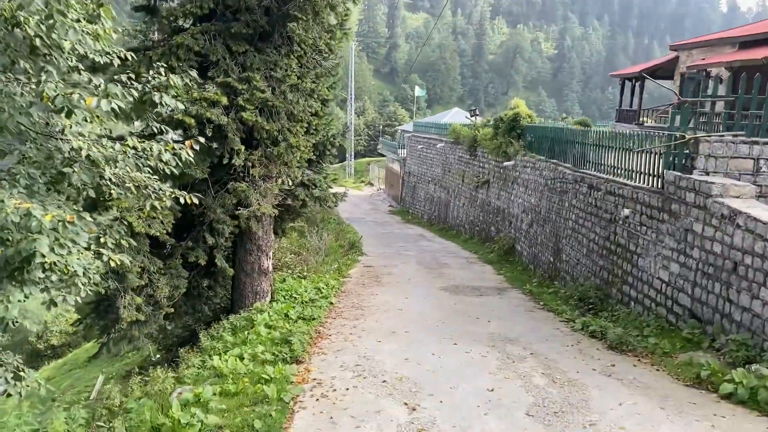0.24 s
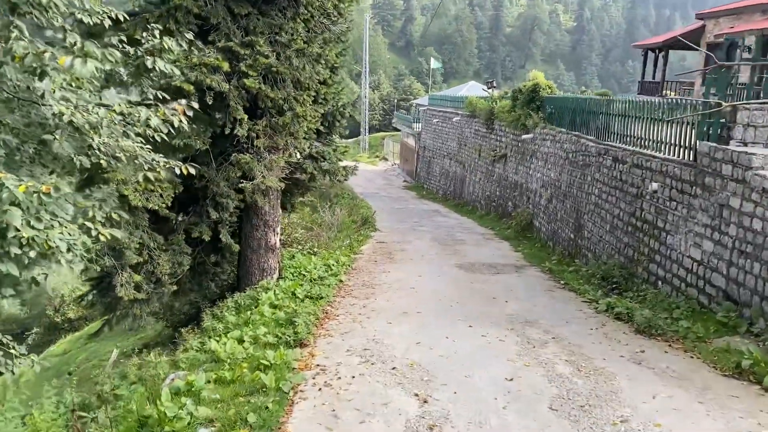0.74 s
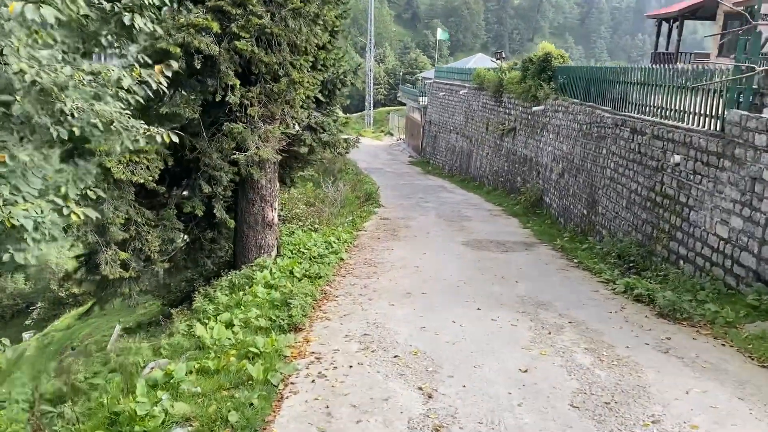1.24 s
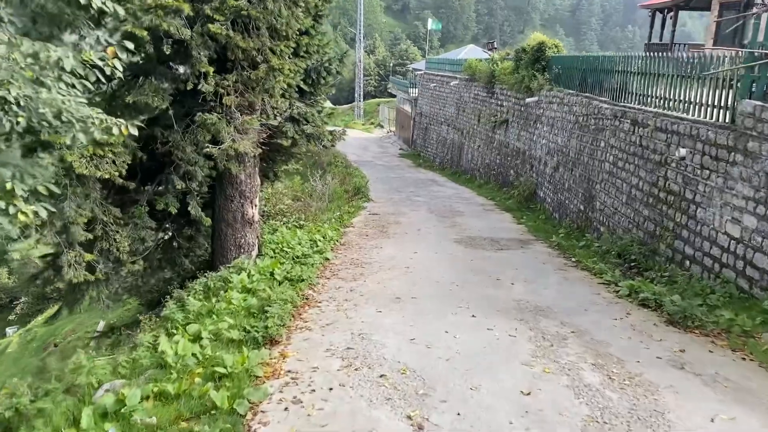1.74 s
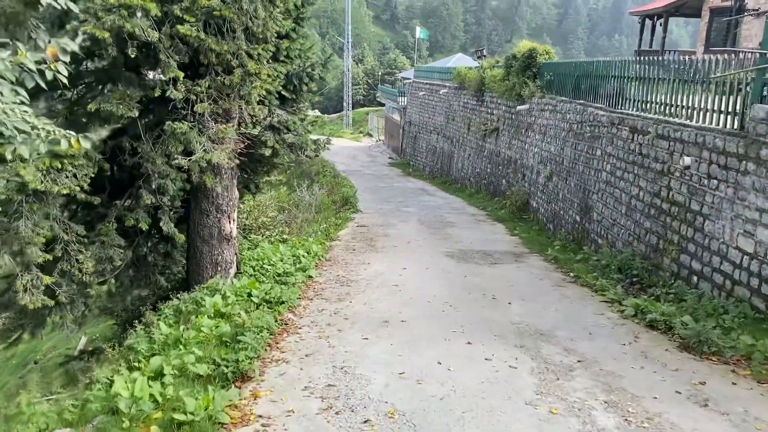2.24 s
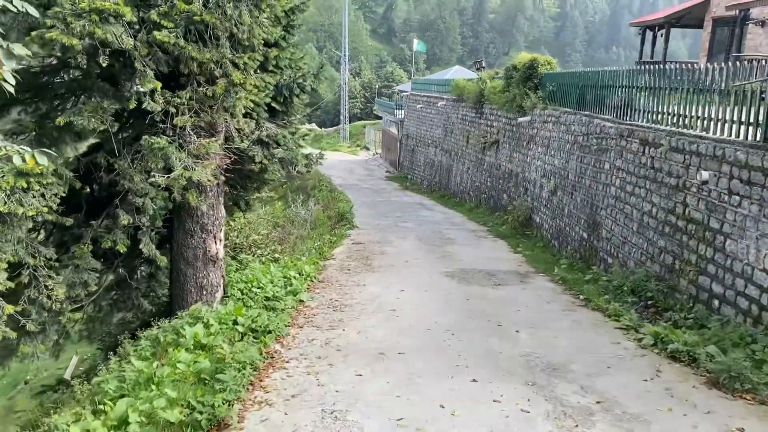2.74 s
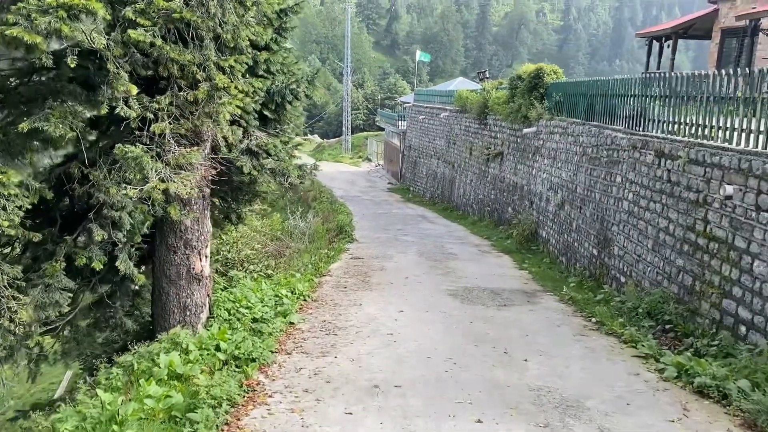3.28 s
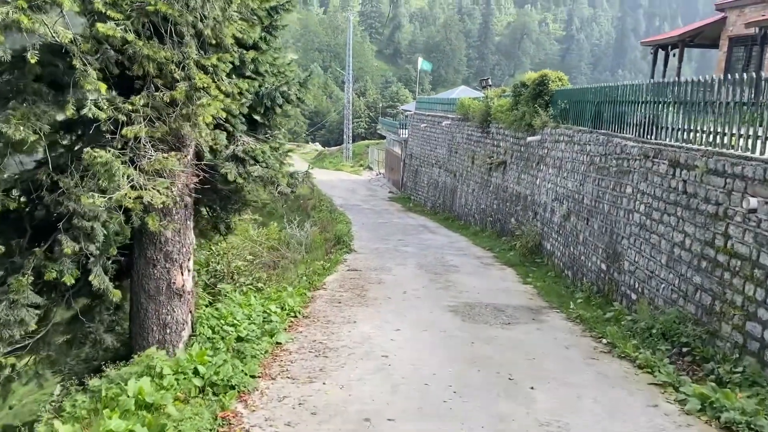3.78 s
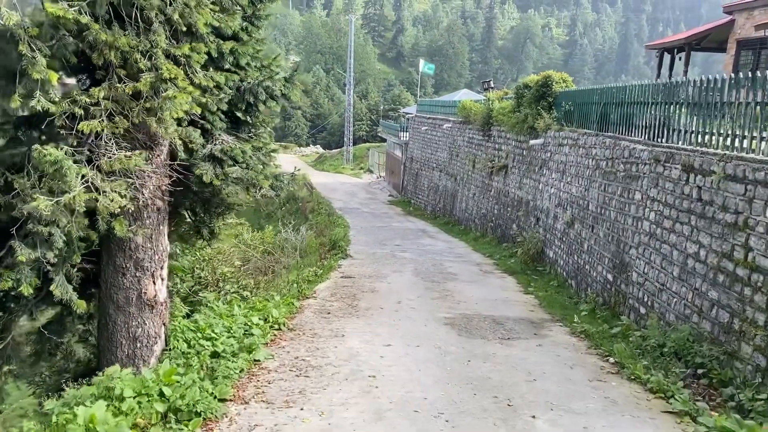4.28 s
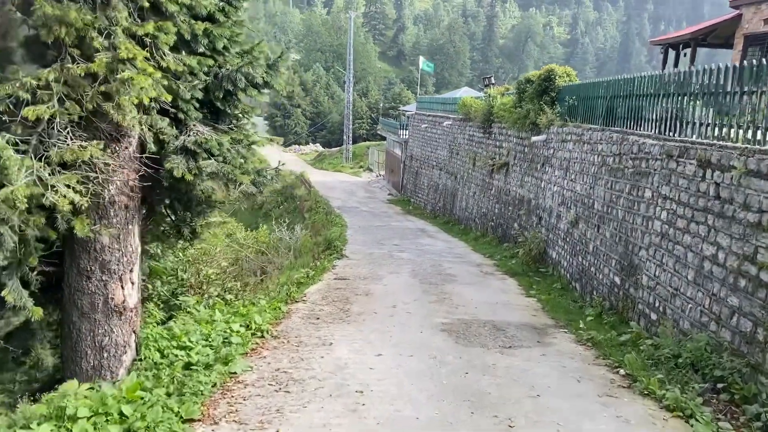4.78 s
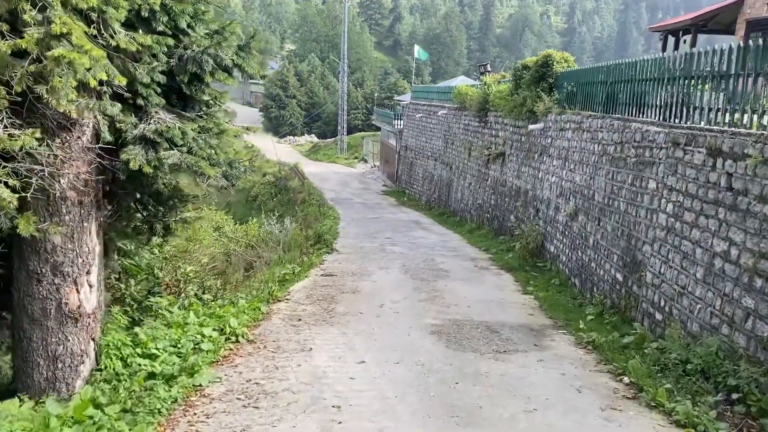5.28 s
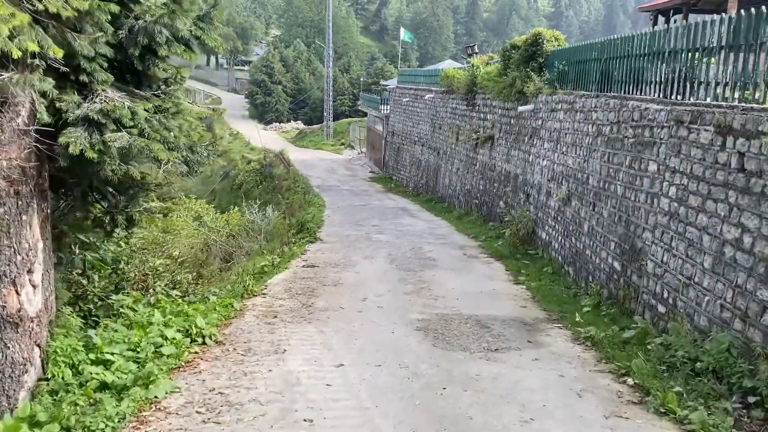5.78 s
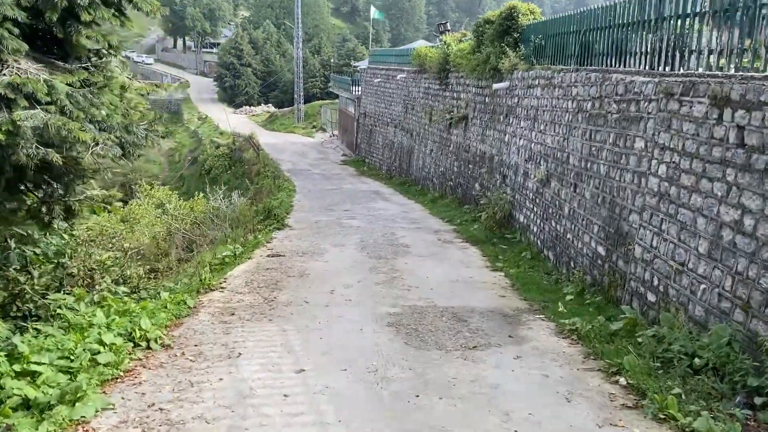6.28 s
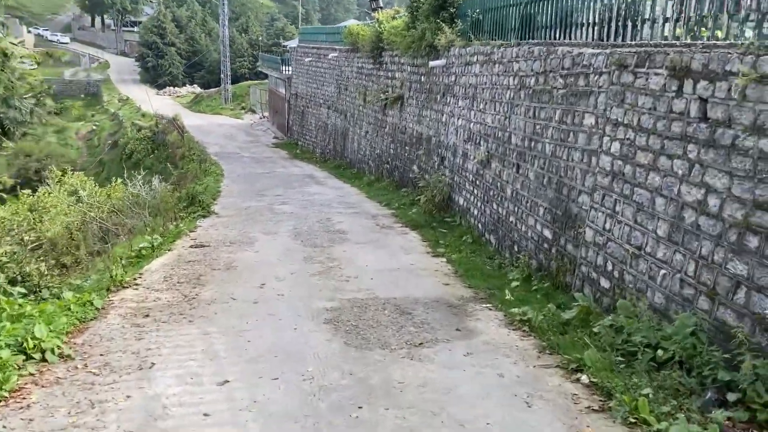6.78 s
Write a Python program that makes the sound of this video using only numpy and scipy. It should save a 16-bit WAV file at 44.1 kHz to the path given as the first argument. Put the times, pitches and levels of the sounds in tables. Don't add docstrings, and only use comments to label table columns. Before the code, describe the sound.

A forest lane in summer, heard from a walker's handheld stereo microphone. From 0 s a dense, piercing cicada hiss fills the treble, with a lower insect chorus beneath; the high layer gradually weakens. The nearest singer rattles fast, slows and stops at about 1.6 s. Short rough chirps, often in pairs, recur throughout, and even, low-pitched insect drones come and go from 0.9 to 5.2 s. A crow gives five hoarse caws at about 2.1, 2.5, 2.9, 3.3 and 3.7 s, slightly falling in pitch, softened by the trees. Farther cicadas sing at 3.1-4.2 s and 4.6-5.5 s. From 4.9 to 6.8 s a close one buzzes in short, sharp click bursts. Shoes knock and scratch on grit, busiest in the first 1.4 s; small stones snap, especially around 5.6-6.2 s. Clothes swish with each stride, and low wind gusts bump the microphone until the end at 7 s.

```python
import sys
import numpy as np
from scipy import signal
from scipy.fft import rfft, irfft, next_fast_len
from scipy.io import wavfile
from scipy.ndimage import uniform_filter1d, minimum_filter1d, map_coordinates

SR = 44100
rng = np.random.default_rng(int(sys.argv[2]) if len(sys.argv) > 2 else 0)


def dump_mix(stems):
    frames = np.atleast_2d(stems).T
    limited = np.clip(frames, -1, 1)
    pcm = np.round(limited * 32767).astype(np.int16)
    wavfile.write(sys.argv[1], SR, pcm)


def volts(x):
    e = np.asarray(x, float) / 20
    return 10 ** e


N = 309582
SIZE = next_fast_len(N)
HZ = np.arange(SIZE // 2 + 1) * SR / SIZE
T = np.arange(N) / SR


def rms_one(x):
    return x / np.sqrt(np.mean(x ** 2) + 1e-20)


def drift(rate):
    slow = rng.standard_normal(int(N / SR * rate) + 3)
    coarse = T[::16]
    return np.interp(T, coarse, map_coordinates(slow, [coarse * rate], order=3))


def colour(x, spectrum):
    hz, db = np.transpose(spectrum)
    weight = volts(np.interp(np.log(HZ + 1), np.log(hz), db, -90, -90))
    return irfft(rfft(x, SIZE) * weight, SIZE)[..., :N]


def resonate(x, modes, spread_db=0):
    out = 0
    for k, (hz, width, db) in enumerate(modes):
        r = np.exp(-np.pi * width / SR)
        struck = x * volts(db + spread_db * rng.standard_normal(N)) + 1e-18
        poles = [1, -2 * r * np.cos(2 * np.pi * hz / SR), r * r]
        out = out + (-1) ** k * signal.lfilter([1, 0, -1], poles, struck) * (1 - r * r) / 2
    return out


def pulses(rate, jitter, weak_db, late):
    phase = np.cumsum(rate * (1 + jitter * drift(60))) / SR
    first = np.diff(np.floor(phase), prepend=0)
    second = np.diff(np.floor(phase + .5 - late), prepend=0)
    return first + second * volts(weak_db)


def phrases(rows, edge):
    rate, gain = np.full(N, 150.), np.zeros(N)
    for start, end, per_s, db in rows:
        on = np.clip(np.minimum(T - start, end - T) / edge, 0, 1)
        rate[on > 0] = per_s
        gain += volts(db) * np.sin(on * np.pi / 2) ** 2
    return rate, gain


def leaves(x, t60, wet_db):
    lag = np.arange(int(.5 * SR)) / SR
    tails = rng.standard_normal((2, len(lag))) * volts(-60 * lag / t60) * np.minimum(lag / 0.0012, 1)
    tails *= volts(wet_db) / np.sqrt(np.sum(tails ** 2, axis=1, keepdims=True))
    near, sideways = signal.fftconvolve(x[None], tails, axes=1)[:, :N]
    return x + near, sideways


def ports(front, sideways, pan_db=0):
    # f/Hz, lead of the right [turns], likeness [0-1]
    port_pair = [(296, 0, 1), (447, 0, 0.48), (675, -0.092, 0.53), (1120, -0.12, 0), (1770, 0.21, 0),
                 (2130, -0.093, 0.88), (3690, -0.28, 0.6), (4270, 0.041, 0.26), (5360, -0.28, .35),
                 (6500, -0.083, 0.6), (7560, 0.14, 0.93), (9050, 0.51, 1), (10720, 0.97, .96),
                 (13260, 1.5, 0.8), (16800, 2.126, 0.8)]
    hz, turns, alike = np.transpose(port_pair)
    half = np.exp(1j * np.pi * np.interp(HZ, hz, turns))
    alike = np.clip(np.interp(HZ, hz, alike), 0, 1)
    a = rfft(front, SIZE) * np.sqrt((1 + alike) / 2)
    b = rfft(sideways, SIZE) * np.sqrt((1 - alike) / 2)
    left = (a + b) / half * volts(pan_db / 2)
    right = (a - b) * half * volts(-pan_db / 2)
    return irfft(np.array([left, right]), SIZE)[:, :N]


def wind():
    # f/Hz, level/dB per Hz
    rumble = [(18, -39), (30, -10.5), (48, 2), (70, 2), (110, -3), (180, -9.5), (300, -20.5), (500, -41),
              (900, -50)]
    # t/s, level/dB
    breeze_course = [(0.0, -49), (0.78, -55), (1.27, -49), (1.64, -53.5), (2.46, -51), (4.28, -58),
                     (4.4, -53), (4.59, -59), (5.08, -59), (6.22, -49), (6.55, -48), (7.02, -57)]
    # t/s, length/s, level/dB
    gusts = [(0.07, 0.076, -43.5), (0.214, 0.042, -44), (0.437, 0.11, -43.5), (0.74, 0.17, -46),
             (0.983, 0.17, -44), (1.212, 0.094, -44), (1.324, 0.1, -47), (2.063, 0.034, -43.5),
             (2.486, 0.16, -47), (3.274, 0.018, -32), (3.36, 0.023, -36), (3.689, 0.031, -40),
             (4.214, 0.14, -44), (4.38, 0.16, -43.5), (4.663, 0.052, -43), (4.734, 0.029, -44),
             (4.936, 0.0244, -39), (5.323, 0.048, -44.5), (5.501, 0.16, -42), (5.707, 0.036, -43),
             (5.981, 0.16, -41.5), (6.2, 0.12, -49), (6.333, 0.19, -45), (6.584, 0.044, -44),
             (6.858, 0.064, -43)]
    edge_s = 0.024
    lumps = rng.standard_normal(N) * volts(1.14 * drift(25) + 2.9 * drift(70))
    buffet = colour(lumps, rumble)
    push = 0
    for s, length, db in gusts:
        on = np.clip(np.minimum(T - s, s + length - T) / edge_s + 0.35, 0, 1)
        push = push + volts(db - 0.5) * on
    breeze = volts(np.interp(T, *np.transpose(breeze_course)) + 1.5 + 2.8 * drift(14))
    return np.maximum(breeze, push) * buffet / np.sqrt(uniform_filter1d(buffet ** 2, size=4000))


def chorus_and_hush():
    # f/Hz, level/dB per Hz
    shrill_colour = [(4000, -95), (5500, -31), (7000, -9), (8200, -6), (9400, 1), (10600, -1), (12000, -5),
                     (13300, -4.5), (14200, -12.5), (15500, -17.5), (16300, -43)]
    low_colour = [(1600, -27), (2050, -10.5), (2400, .5), (2900, 3), (3500, -0.5), (4000, -8), (4600, -22)]
    middle_colour = [(3500, -24.5), (4000, -9.5), (4600, -6.5), (5500, -4), (6500, -4), (7500, -6),
                     (8300, -11.5)]
    hush_colour = [(250, 2.5), (350, -4.5), (500, -2.5), (800, -9.5), (1300, -6), (1750, -8.5),
                   (2200, -6.5)]
    # t/s, level/dB
    vigour = [(0, -36.5), (.6, -36.5), (1.19, -35.5), (1.52, -37.5), (1.6, -40.5), (2.0, -39.5),
              (2.4, -41.5), (3.3, -40), (3.9, -41.5), (4.15, -44), (4.35, -42.5), (4.58, -45.5),
              (4.95, -43.5), (5.45, -45.5), (5.75, -43.5), (6.25, -43.5), (6.6, -47.5), (7.02, -46.5)]
    # t/s, level/dB
    nearness = [(0, -51), (.8, -50), (1.6, -49), (2.4, -49.5), (3.1, -50), (4.1, -48.5), (4.8, -47),
                (5.3, -47.5), (6.0, -45), (6.4, -48.5), (7.02, -49)]
    # t/s, level/dB
    strides = [(.22, -62), (.82, -62), (1.32, -66), (1.84, -61.5), (2.35, -63), (2.84, -58), (3.46, -60),
               (4.05, -68.5), (4.59, -64.5), (5.1, -66), (5.58, -60), (6.121, -64.5), (6.62, -76)]
    low_db, low_follows = -43.5, 0.065
    hush_db, rise_s, fall_s = -65.5, 0.11, 0.084

    vigour_db = np.interp(T, *np.transpose(vigour))
    swish = 0
    for s, db in strides:
        before = np.minimum(T - s, 0) / rise_s
        after = np.maximum(T - s, 0) / fall_s
        swish = swish + volts(db - 12.0 * before ** 2 - 6.9 * after ** 2)
    white = rng.standard_normal((4, 2, N)) * volts(2.56 * rng.standard_normal(N))
    shrill = volts(vigour_db + 3.5 + 0.6 * drift(6) + 0.64 * drift(200))
    low_swing_db = low_follows * (vigour_db - vigour_db.mean())
    low = volts(low_db - 2.0 + low_swing_db + 1.34 * drift(13) + 0.5 * drift(100))
    middle = volts(np.interp(T, *np.transpose(nearness)) + 1.1 * drift(8) + .6 * drift(60))
    hush = (volts(hush_db) + swish) * volts(1.6 * drift(3.93) + 2.0 * drift(40))
    gains = (shrill, low, hush, middle)
    colours = (shrill_colour, low_colour, hush_colour, middle_colour)
    layers = zip(gains, white, colours)
    return ports(*sum(gain * rms_one(colour(w, spectrum)) for gain, w, spectrum in layers))


def steps():
    # t/s, peak level/dB, ring f/Hz, scratch at 600-1600 Hz [dB]
    soles = [(0.152, -34.5, 322, -20), (0.218, -32, 430, -3.5), (0.543, -47, 553, -31),
             (0.683, -44, 277, -18), (0.711, -26.5, 390, -24), (0.764, -38.5, 336, -7),
             (0.861, -28.5, 420, -26), (1.257, -31.5, 283, -24), (1.325, -39.5, 530, -5),
             (1.37, -32.5, 450, -18), (1.834, -36.5, 288, -8), (2.289, -40, 266, -1),
             (2.372, -31.5, 350, -8.5), (2.439, -42, 323, -11), (2.827, -41, 310, -23),
             (3.447, -42, 283, -4), (3.524, -40, 553, -15), (4.463, -41, 317.4, -5), (4.561, -43, 576, -8),
             (4.617, -35.5, 555.4, -14), (4.97, -37.5, 254.8, -10), (5.688, -49, 335.4, 2),
             (6.139, -36.5, 374, -5), (6.297, -42.5, 557, -24), (6.672, -41.5, 360, -6.5),
             (6.748, -39, 250, -27), (6.828, -44, 536, -18)]
    # t/s, peak level/dB
    stones = [(0.69, -58), (0.74, -54), (0.777, -52), (0.853, -48), (1.296, -49), (1.757, -57),
              (1.919, -55.5), (2.409, -65), (2.795, -53), (2.886, -55), (4.582, -47.5), (5.144, -55),
              (5.337, -58), (5.592, -58), (5.612, -48), (5.636, -53), (5.785, -61), (5.812, -52.5),
              (5.841, -51), (6.075, -58), (6.15, -45), (6.163, -54), (6.173, -52), (6.194, -59)]
    stone_hz, stone_grit_db = 292, 8.5
    crack_db, crack_t60_s = -1, .012
    out, t = np.zeros((2, N + 4000)), np.arange(4000) / SR
    contacts = soles + [(s, db, stone_hz, stone_grit_db) for s, db in stones]
    luck = rng.standard_normal((len(contacts), 2, 4000))
    band = signal.butter(2, [600, 1600], "band", fs=SR, output="sos")
    scratch = signal.sosfilt(band, luck)
    for (s, db, hz, grit_db), grit in zip(contacts, scratch):
        ring = np.sin(2 * np.pi * hz * t) * volts(-60 * t / 0.023)
        overtone = np.sin(2 * np.pi * 2.17 * hz * t) * volts(-8 - 60 * t / 0.019)
        knock = (ring + overtone) * np.minimum(t / 0.0021, 1) * [[1], [.1]]
        rub = 3.0 * volts(grit_db - 60 * t / 0.06) * np.minimum(t / 0.0024, 1) * grit
        out[:, round(s * SR):][:, :4000] += volts(db) * (knock + rub)
    snaps = np.diff(luck[len(soles):], prepend=0)
    for (s, db), snap in zip(stones, snaps):
        out[:, round(s * SR):][:, :4000] += volts(db + crack_db - 60 * t / crack_t60_s) * snap
    return ports(*out[:, :N])


def crow():
    # t/s, length/s, crest pitch f/Hz, crest level/dB
    caws = [
        (2.108, 0.19, 310.3, -43),
        (2.508, 0.2, 304, -41),
        (2.908, 0.2, 301.3, -41),
        (3.313, .195, 297.4, -42.5),
        (3.745, 0.19, 296.9, -43),
    ]
    arch = [(0, .8), (.1, .84), (.27, .94), (.4, .985), (.52, .995), (.64, .98), (.76, .94), (.88, .88),
            (1, .83)]
    # share of the caw [0-1], level/dB
    shape = [(0, -16), (.12, -11), (.27, -1.5), (.5, 1.5), (.78, -0.5), (.88, -10.5), (1, -25)]
    # multiple of the pitch, level/dB, loss with the beak nearly shut [dB], favoured at [share of caw]
    partials = [(2, -30, 0, .5), (3, -16, -14, .5), (4, -3, -2, .3), (5, 1, -22, .7), (6, 1.5, -26, .5),
                (7, -16, -25, .5)]
    favour_db, favour_width = 7, .12
    breath_db, rasp_db = -11.5, 3.0
    echo_s, echo_db = .19, -23

    pitch, gain, shut, strain, done = np.full(N, 280.), np.zeros(N), np.zeros(N), np.zeros(N), np.zeros(N)
    for start, length, top_hz, db in caws:
        share = (T - start) / length
        strain = np.where(share >= 0, np.clip(share, .35, .8), strain)
        on = (share >= 0) & (share <= 1)
        done[on] = share[on]
        pitch[on] = top_hz * np.interp(share[on], *np.transpose(arch))
        gain[on] = volts(db + np.interp(share[on], *np.transpose(shape)))
        shut[on] = np.interp(share[on], [.12, .4, .85, 1], [0.51, 0.23, 0.014, 0.33])
    phase = 2 * np.pi * np.cumsum(pitch * (1 + 0.009 * drift(90))) / SR
    flutter = 1 + 1.0 * strain * np.cos(phase / 3 + 2.5 * drift(27))
    voice = 0
    for k, db, lost_db, best in partials:
        favour = favour_db * np.exp(-((done - best) / favour_width) ** 2)
        strength = volts(db + lost_db * shut + favour + 2.0 * drift(40))
        breath = drift(300) * np.sin(k * phase) + drift(300) * np.cos(k * phase)
        voice = voice + strength * (np.sin(k * phase) + volts(breath_db) * breath)
    voice /= np.sqrt(uniform_filter1d(voice ** 2, size=1500))
    rasp = volts(rasp_db * strain * drift(250))
    call = volts(0.5) * uniform_filter1d(gain, size=300) * voice * flutter * rasp
    call = call + volts(echo_db) * np.interp(T - echo_s, T, call)
    return ports(*leaves(call, t60=.12, wet_db=-8), pan_db=-5.5)


def chirper():
    # t/s, end/s, pulse rate f/Hz, level/dB
    chirps = [(.105, .18, 270, -43.5), (.248, .31, 280, -43), (.398, .47, 270, -42), (.555, .63, 280, -42),
              (.74, .81, 220, -40.5), (1.15, 1.225, 300, -42), (1.3, 1.365, 255, -39),
              (1.68, 1.75, 284, -41.5), (1.822, 1.89, 310, -41.5), (2.358, 2.43, 260, -40),
              (2.5, 2.565, 470, -46), (2.765, 2.805, 320, -44), (3.115, 3.175, 267, -42),
              (3.255, 3.32, 260, -38.5), (3.605, 3.65, 274, -46.5), (3.755, 3.81, 200, -43),
              (3.945, 4.015, 267, -39), (4.086, 4.16, 360, -42), (4.175, 4.214, 310, -47.5),
              (4.436, 4.48, 300, -44), (4.57, 4.62, 205, -44.5), (4.787, 4.855, 295, -42),
              (4.93, 5.0, 290, -43.5), (5.712, 5.765, 330, -43), (5.85, 5.92, 310, -41.5),
              (6.012, 6.075, 325, -40), (6.18, 6.238, 310, -41.5), (6.662, 6.72, 290, -46.5),
              (6.8, 6.852, 270, -44.5)]
    # f/Hz, width/Hz, level/dB
    body = [(2474, 595, 4), (3020, 430, 4.5), (3643, 520, 2.5)]
    rate, gain = phrases(chirps, edge=.026)
    arch = 1 + .05 * (np.minimum(gain / volts(-43.5), 1) - 1)
    train = pulses(rate / 2 * arch, .012, 0.93, .02) * volts(2.0 * drift(150))
    voice = resonate(resonate(train, body, spread_db=2.5), body)
    return ports(*leaves(gain * rms_one(voice), t60=0.14, wet_db=-6), pan_db=-2.5)


def droner():
    # t/s, end/s, cycle rate f/Hz (two pulses each), level/dB
    drones = [
        (.85, 1.07, 152, -52),
        (1.38, 1.6, 150, -52),
        (1.9, 2.1, 149.3, -48.5),
        (2.6, 2.86, 148.3, -47),
        (3.3, 3.6, 148.6, -48),
        (4.18, 4.46, 148, -47.5),
        (4.98, 5.22, 148.2, -50),
    ]
    # f/Hz, width/Hz, level/dB
    body = [(2290, 380, -2), (4520, 600, -1), (5000, 650, -1), (7500, 1500, 1), (10500, 2600, -5)]
    rate, gain = phrases(drones, edge=.06)
    train = pulses(rate * (1 + .002 * drift(6)), .0035, -1.5, .033)
    voice = resonate(resonate(train, body), body)
    drone = volts(1.5) * gain * volts(2.0 * drift(15)) * rms_one(voice)
    return ports(*leaves(drone, t60=.08, wet_db=-9), pan_db=-0.5)


def near_cicadas():
    # t/s, end/s, first cycle rate f/Hz, last cycle rate f/Hz, click level before
    # the swell/dB
    singers = [
        (-.5, 1.56, 139, 110, -21),
        (3.05, 4.17, 152, 125, -29),
        (4.62, 5.5, 136, 107, -32),
    ]
    sag_power = (2.6, 1.3, 1.0)
    swell = (-1.5, -4, 2.0)
    # first click t/s, last click t/s, clicks [count]
    bursts = [(4.9374, 4.9531, 4), (4.999, 5.0261, 6), (5.1051, 5.1426, 8), (5.2143, 5.2419, 6),
              (5.3434, 5.3861, 9), (5.4766, 5.5099, 7), (5.5686, 5.6129, 9), (5.698, 5.7, 1),
              (5.9565, 5.957, 1), (5.8427, 5.8757, 7), (6.021, 6.0654, 9), (6.1889, 6.2219, 7),
              (6.4914, 6.5183, 6), (6.7849, 6.8136, 6)]
    burst_level = [-18, -19, -18.5, -16, -14.5, -15.5, -17.5, -23, -30, -18.5, -19, -19, -15, -16.5]
    burst_fade = [1.5, -1.5, 0, -2, -1.5, -4, 1, 0, 0, -1.5, -7, -1.5, -4, -2]
    # f/Hz, width/Hz, level/dB
    drum = [(7200, 8700, -20), (9175, 860, 13.5), (9950, 2320, 7.5), (12070, 1130, 9), (13940, 520, -12),
            (2500, 800, -6.5), (5000, 3800, -10.5)]
    song_edge_s = .04

    clicks = np.zeros(N)
    for (start, end, first, last, db), power, swell_db in zip(singers, sag_power, swell):
        done = np.clip((T - start) / (end - start), 0, 1)
        train = pulses(first + (last - first) * done ** power, .006, -2.5, .03)
        fade = np.clip(np.minimum(T - start, end - T) / song_edge_s, 0, 1)
        clicks += train * volts(db + swell_db * (2.5 - done)) * fade
    for (first, last, count), db, fade_db in zip(bursts, burst_level, burst_fade):
        at = np.linspace(first, last, count) - .0004 * (np.arange(count) % 2) - .0003
        click_db = db + fade_db * np.linspace(-.5, .5, count) + rng.normal(0, 1.5, count)
        clicks[(at * SR).astype(int)] += volts(click_db + 1.0 * (at == at[0]))
    second_snap = 0.36 * np.roll(clicks, 21) * rng.uniform(-0.64, 1, N)
    third_snap = 0.57 * np.roll(clicks, 64) * rng.uniform(-0.27, 1, N)
    rung = resonate(clicks + second_snap + third_snap, drum, spread_db=2.5)
    rung = signal.sosfilt(signal.butter(3, 14500, fs=SR, output="sos"), rung)
    return ports(*leaves(volts(10.5) * rung, t60=.055, wet_db=-12))


def drop_faint(x):
    # f/Hz, level/dB per Hz
    faintest = [(300, -112), (1000, -110), (1500, -108), (1750, -103), (2200, -104), (4500, -93.5),
                (7000, -93), (8400, -89), (9000, -85), (9500, -88), (11500, -91), (12500, -87.5),
                (13000, -82.5), (13500, -83), (14000, -88.5), (15000, -90.5), (16500, -91)]
    pair = np.pad([x[0] + x[1], x[0] - x[1]], ((0, 0), (729, 0))) / 2
    hz, _, z = signal.stft(pair, SR, nperseg=2048, scaling="psd")
    edges = np.r_[0:96:8, 96:240:18, 240:320:27, 320:1025:16]
    band_hz = hz[edges]
    widths, power = np.diff(edges, append=1025), np.abs(z) ** 2
    shrill_db = 10 * np.log10(power[:, 320:640].mean(axis=(0, 1)) + 1e-14)
    loudness_db = minimum_filter1d(shrill_db, size=5)
    frames = len(shrill_db)
    inside = np.abs(np.arange(frames) / frames - .5) < .48
    sudden = (shrill_db > loudness_db + 5.5) & inside
    rides = np.where(band_hz > 13000, .78, .8)[:, None]
    wander_db = 5.9 * uniform_filter1d(rng.standard_normal(frames), size=9)
    raised_db = rides * (loudness_db + 80.0) + wander_db
    treble = np.clip(band_hz / 4000 - .8, 0, 1)[:, None]
    difference_db = np.reshape([0, 3.5], (2, 1, 1))
    floor_db = np.interp(band_hz, *np.transpose(faintest))[:, None]
    limit = volts(2 * (floor_db + treble * (raised_db + difference_db)))
    whim = volts(6.1 * treble * uniform_filter1d(rng.standard_normal(limit.shape), size=3))
    spared = np.where(sudden, np.where(band_hz > 13000, .5, .01)[:, None], 1)
    band_power = np.add.reduceat(power, edges, axis=1) / widths[:, None]
    bands_kept = np.repeat(band_power > limit * whim * spared, widths, axis=1)
    lines_kept = power > .5 * np.repeat(limit * spared, widths, axis=1)
    kept = signal.istft(z * bands_kept * lines_kept, SR, nperseg=2048, scaling="psd")[1]
    mid, side = kept[:, 729:729 + N]
    return np.array([mid + side, mid - side])


def scene():
    air_and_road = wind() + chorus_and_hush() + steps()
    return air_and_road + crow() + chirper() + droner() + near_cicadas()


def top_cut(x):
    return signal.sosfilt(signal.butter(12, 16780, fs=SR, output="sos"), x)


def record(dry):
    mix = drop_faint(dry)
    return top_cut(mix)


dry = scene()
out = record(dry)
dump_mix(out)
```